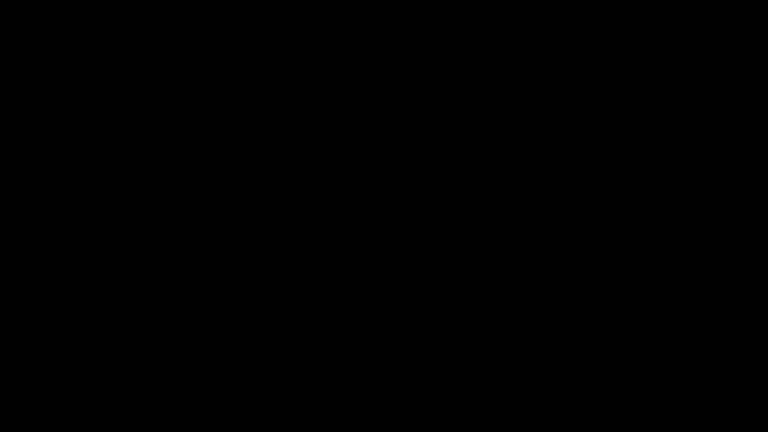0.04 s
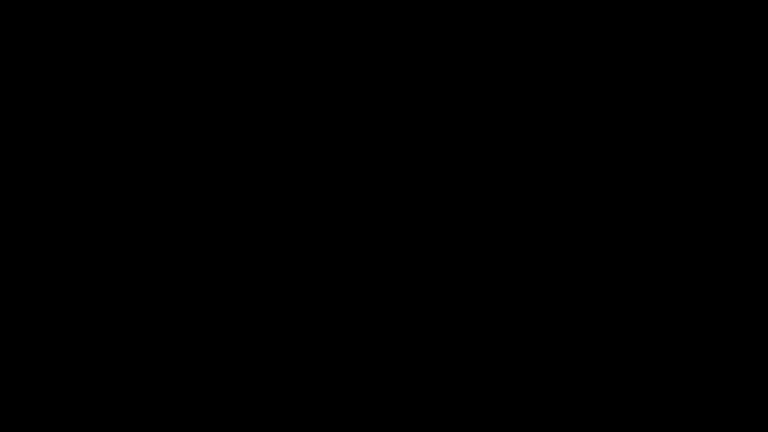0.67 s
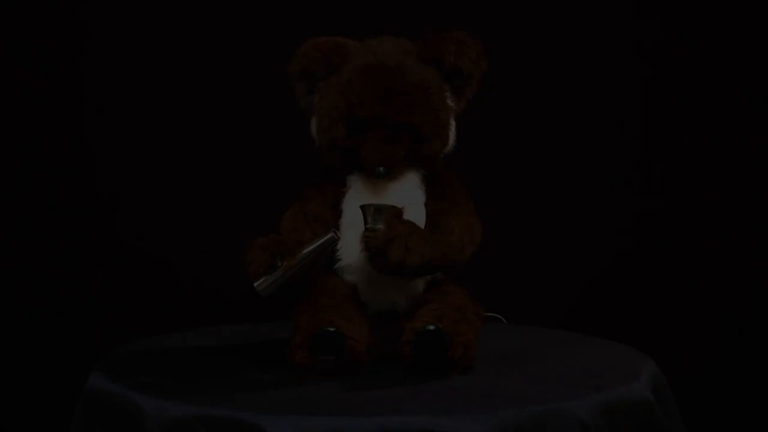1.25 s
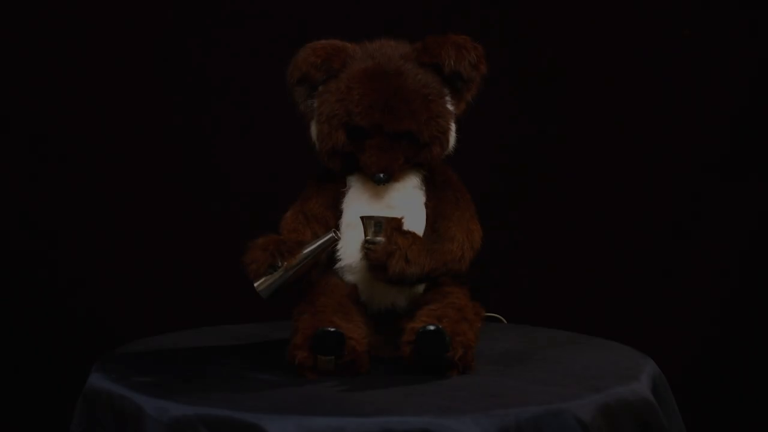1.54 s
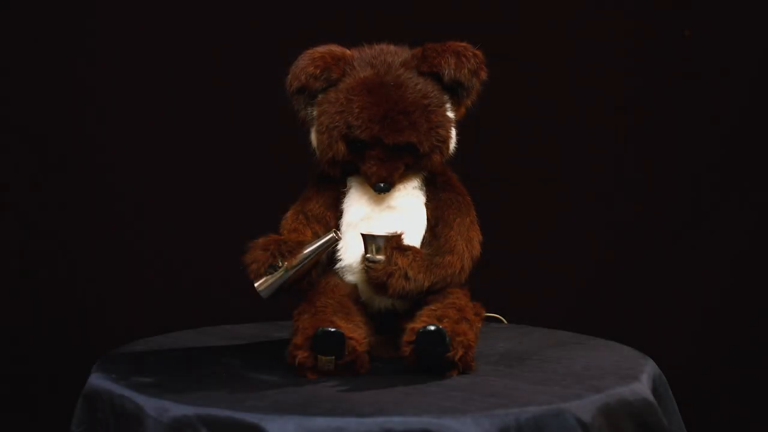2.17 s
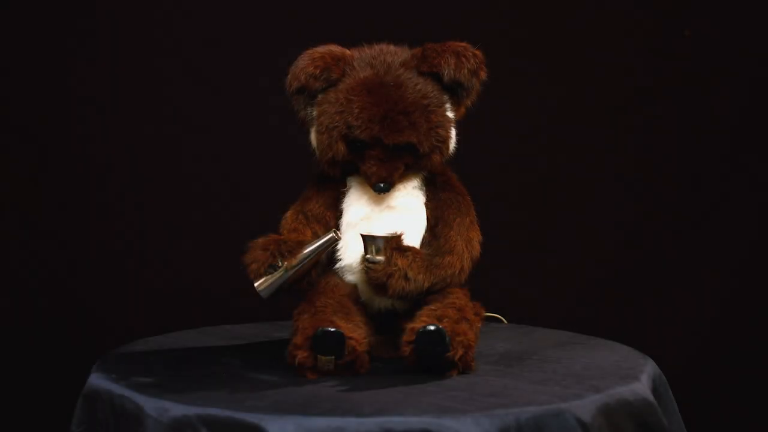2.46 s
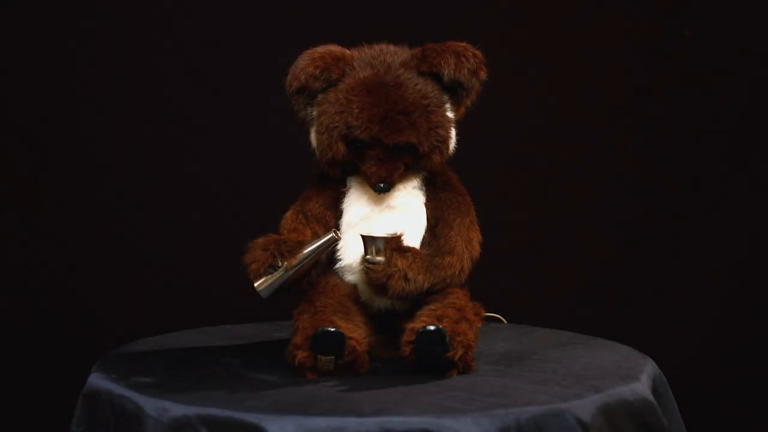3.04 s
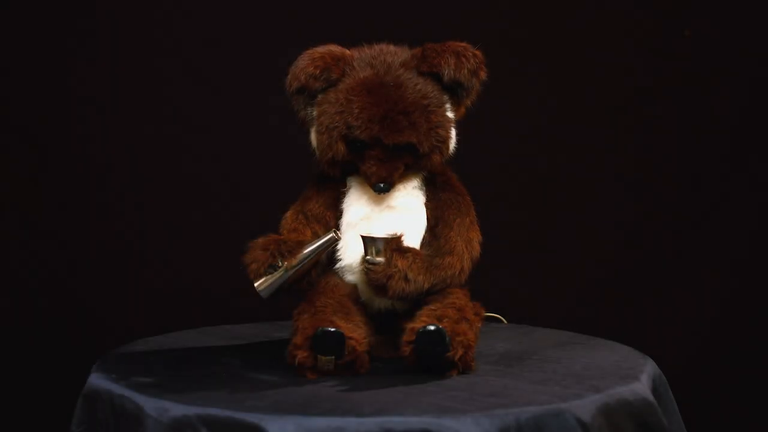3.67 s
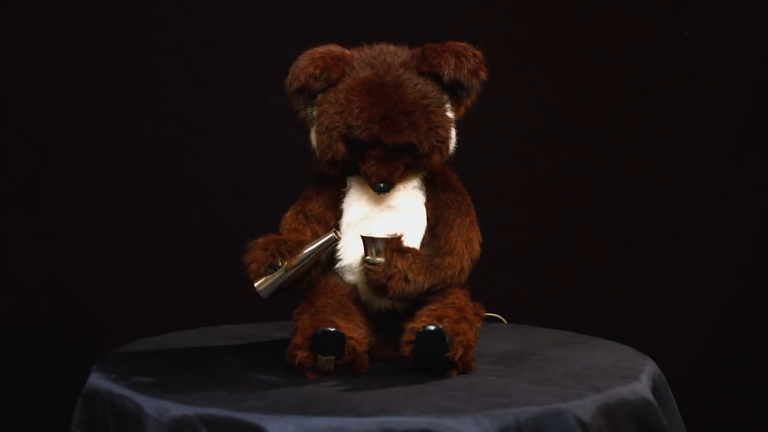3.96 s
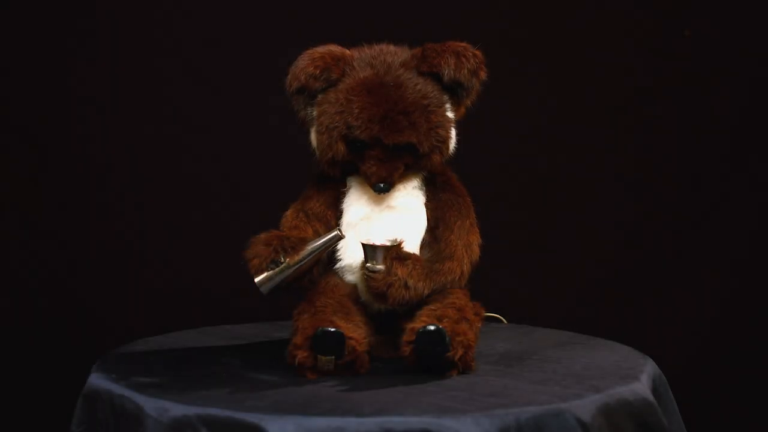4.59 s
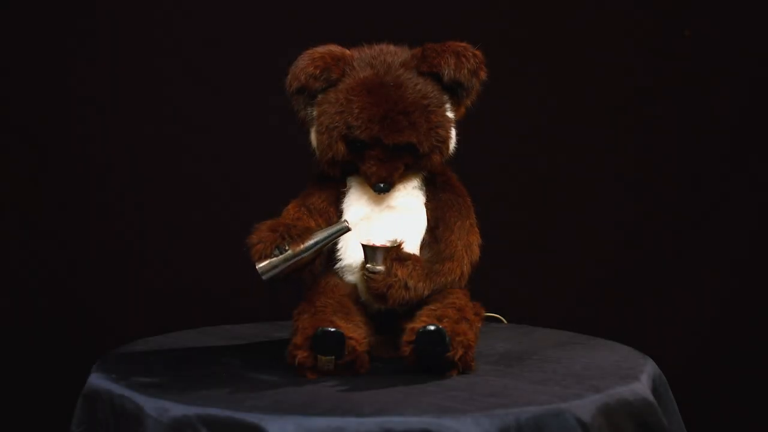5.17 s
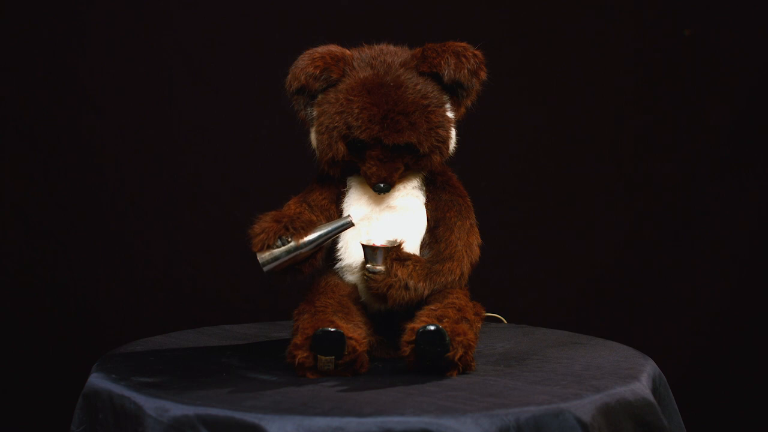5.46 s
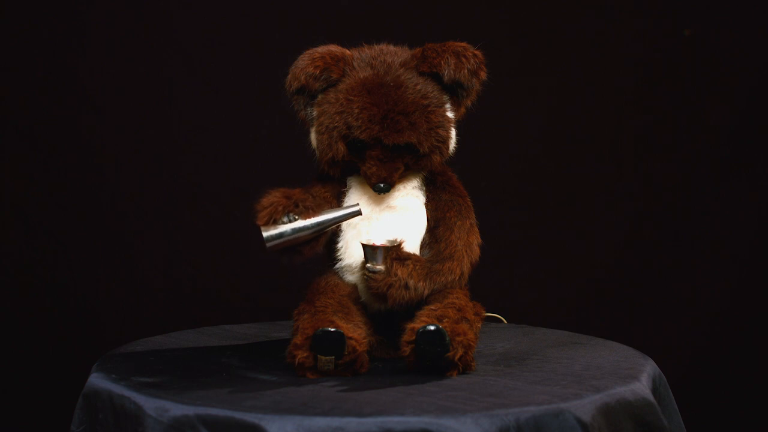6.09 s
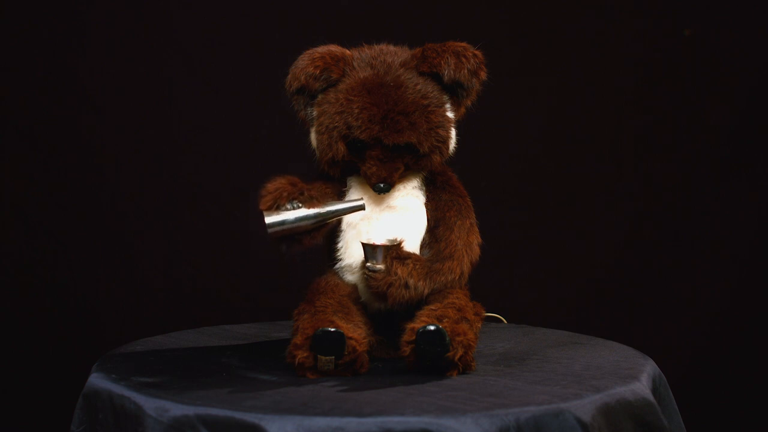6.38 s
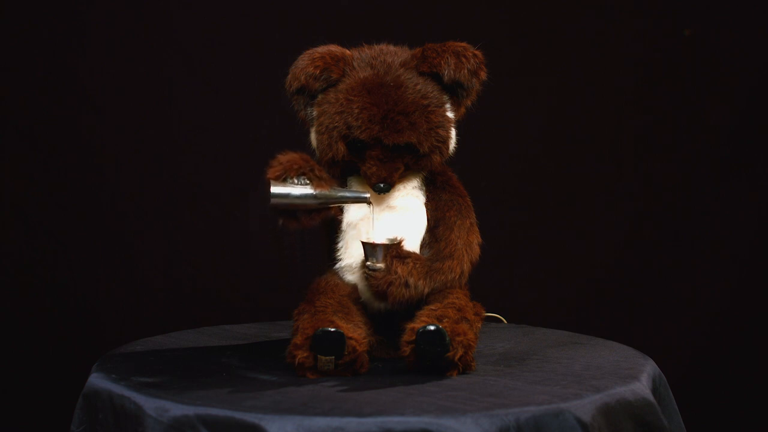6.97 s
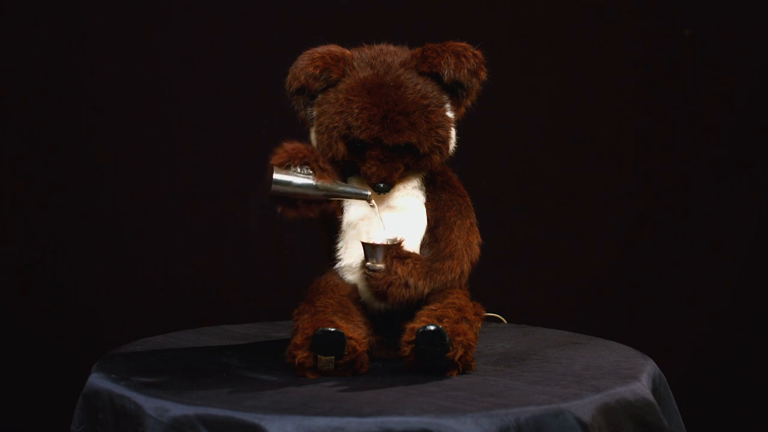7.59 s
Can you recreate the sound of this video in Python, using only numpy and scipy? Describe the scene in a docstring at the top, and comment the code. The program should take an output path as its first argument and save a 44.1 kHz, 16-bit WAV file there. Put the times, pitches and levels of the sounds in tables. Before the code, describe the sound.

Close, steady whine and rattle of a mechanical toy's gearbox, ticking a few times and slowing slightly with short gear scrapes.

```python
"""A motor-driven toy bear on a cloth-covered table slowly lifts a bottle and pours, in a quiet dry room.
After a short silence the toy fades in: its small motor and a gear wheel whine, and loose teeth rattle in
the metal gearbox under the fur. The linkage ticks three times. Near 5 s the arm starts to lift: a cam
(a lobed wheel) slows the motor, the gears grind briefly and the body rocks on the table. Near 6 s the
motor is back up to speed, and it runs on with a few more short grinds."""
import sys
import numpy as np
from scipy import signal
from scipy.fft import rfft, irfft
from scipy.io import wavfile

SR = 44100
rng = np.random.default_rng(int(sys.argv[2]) if len(sys.argv) > 2 else 0)


def store_pcm(level_fs):
    """Save levels as 16-bit WAV."""
    pcm = np.round(np.clip(level_fs, -1, 1) * 32767).astype(np.int16)
    wavfile.write(sys.argv[1], SR, np.atleast_2d(pcm).T)


N = 345303
TIME = np.arange(N) / SR


def from_db(db):
    """Turn decibels into a number to multiply by."""
    return 10 ** (np.asarray(db) / 20)


def unit_level(x):
    """Scale a sound so that its average level (rms) is 1."""
    return x / np.sqrt(np.mean(x ** 2) + 1e-20)


def ramp(start_s, end_s):
    """Rise evenly from 0 to 1."""
    return np.clip((TIME - start_s) / (end_s - start_s), 0, 1)


def swell(s, length):
    """A bell-shaped rise and fall around time s; length is its spread to either side."""
    return np.exp(-.5 * ((TIME - s) / length) ** 2)


def drift(hz):
    """A smooth random wander, about 1 in size; more hz makes it quicker."""
    step, warm_up = 40, 2000   # samples per point, points thrown away
    r = np.exp(-2 * np.pi * hz * step / SR)
    noise = rng.standard_normal(N // step + warm_up + 2)
    slow = signal.lfilter([1], [1, -2 * r, r * r], noise)[warm_up:]
    return np.interp(np.arange(N) / step, np.arange(len(slow)), unit_level(slow))


def colour(x, spectrum, size=8192):
    """Make each pitch louder or softer as a table says, fading out below its first row."""
    hz, db = np.transpose(spectrum)
    f = np.maximum(np.arange(size // 2 + 1) * SR / size, 1)
    gain = from_db(np.interp(np.log(f), np.log(hz), db)) * np.minimum(f / hz[0], 1) ** 2
    # minimum phase: the filter rings after a hit, never before it
    cepstrum = irfft(np.log(gain))
    cepstrum[1:size // 2] *= 2
    cepstrum[size // 2 + 1:] = 0
    return signal.fftconvolve(x, irfft(np.exp(rfft(cepstrum))))[:N]


def resonate(x, hz, width):
    """Let through a band of pitches around hz; width is in Hz too."""
    r = np.exp(-np.pi * width / SR)
    feedback = [1, -2 * r * np.cos(2 * np.pi * hz / SR), r * r]
    return signal.lfilter(np.array([1, 0, -1]) * (1 - r * r) / 2, feedback, x)


def ring(clicks, hz, ring_s):
    """Each click starts a pure tone that dies away by 60 dB in ring_s."""
    r = np.exp(-np.log(1000) / (ring_s * SR))
    angle = 2 * np.pi * hz / SR
    return signal.lfilter([0, np.sin(angle)], [1, -2 * r * np.cos(angle), r * r], clicks + 1e-18)


# The deep tone colour of the tabletop: (pitch [Hz], relative level [dB])
TABLETOP_COLOUR = [(25, -17), (45, -8), (62, -6.5), (85, -4), (100, 2.5), (140, -2), (200, 0.5),
                   (290, -6.5), (420, -3), (2000, -77)]
def tabletop():
    """The running toy shakes the table; as the arm starts to lift it rocks, then settles."""
    shake_db, rock_db = -60.5, -52.5
    rock_s, rise_s, settle_s = 4.88, .037, .42
    rocking = ramp(rock_s, rock_s + rise_s) * np.exp(-np.maximum(TIME - rock_s, 0) / settle_s)
    level = np.hypot(from_db(shake_db), from_db(rock_db) * rocking)
    return level * unit_level(colour(rng.standard_normal(N), TABLETOP_COLOUR))


# The body bumping on the table: (time [s], length [s], level [dB], pitch [Hz])
BODY_BUMPS = [(4.655, .02, -53, 204), (4.944, 0.025, -59, 130), (5.07, 0.022, -62, 101),
              (5.32, .07, -69, 70), (5.594, .03, -59, 212), (5.818, 0.063, -58, 205)]
def bumps():
    """Soft, low knocks through the cloth as the arm starts to lift."""
    out = np.zeros(N)
    for s, length, db, hz in BODY_BUMPS:
        rumble = resonate(resonate(rng.standard_normal(N), hz, width=70), hz, width=70)
        out += from_db(db) * swell(s, length) * unit_level(rumble)
    return out


# The bright tone colour of rubs and snaps: (pitch [Hz], relative level [dB])
RUB_COLOUR = [(2000, -10), (5000, 13), (8000, -1), (12000, -5), (16000, -16)]
# Light rubs: (time [s], length [s], level [dB])
RUBS = [(1.383, .013, -55), (1.764, 0.07, -54.5), (4.855, .015, -60), (5.76, .02, -66)]
def brushes():
    """Short, soft, high rubs, like fur brushing the arm."""
    rub = unit_level(colour(rng.standard_normal(N), RUB_COLOUR))
    return rub * sum(from_db(db) * swell(s, length) for s, length, db in RUBS)


# Slips of the linkage: (time [s], ping strength [dB], knock strength [dB], thump strength [dB])
LINK_SLIPS = [(1.486, -44.5, -42, -41.5), (3.055, -42.5, -42, -42), (4.036, -40, -16, -35)]
# The notes in a link's ping: (pitch [Hz], relative level [dB], ring time [s])
LINK_NOTES = [(5560, 3, .018), (7200, -3, .024), (7600, 2, 0.019), (8600, 2, .022), (8650, -5, .024),
              (12600, -12, .01)]
def ticks():
    """A link slips: it pings and snaps, knocks on the gearbox and thumps the body."""
    rebound_s, rebound_db, snap_s = .0095, -13, .0022
    s, *levels = np.transpose(LINK_SLIPS)
    clicks = np.zeros((3, N))
    clicks[:, (s * SR).astype(int)] = from_db(levels)
    ping, knock, thump = clicks
    ping = ping + from_db(rebound_db) * np.roll(ping, int(rebound_s * SR))   # the link lands once more
    out = sum(from_db(db - 9.5) * ring(ping, hz, ring_s) for hz, db, ring_s in LINK_NOTES)
    snap_fade = signal.lfilter([1], [1, -np.exp(-1 / (snap_s * SR))], ping + 1e-18)
    out += from_db(3) * colour(snap_fade * rng.standard_normal(N), RUB_COLOUR)
    out += .54 * ring(knock, 1860, .014) - .71 * ring(knock, 3700, .0043) + .17 * ring(knock, 4600, .008)
    return out + resonate(ring(thump, 330, .053), hz=260, width=160)


# The tone colour of the gearbox: (pitch [Hz], relative level [dB])
GEARBOX_COLOUR = [(380, -27.5), (665, -21.5), (740, -6.5), (860, -10), (1130, 0), (1340, -8), (1480, -14.5),
                  (1640, -7), (2030, -7.5), (2320, -18.5), (3100, -26.5), (4500, -24.5), (5700, -40),
                  (7000, -46), (9000, -55)]
def gearbox(x):
    """The metal box colours any sound made inside it, and the fur muffles it."""
    return colour(x, GEARBOX_COLOUR)


# A cam tips over or a tooth catches: (time [s], length [s], scrape level [dB], thud level [dB])
GEAR_CATCHES = [(4.82, .012, -36, -60), (4.853, 0.0079, -24, -58), (5.752, .015, -32, -60),
                (6.362, .006, -29.5, -80), (6.835, .008, -28.5, -80), (7.55, 0.0036, -37, -80)]
def grinds():
    """Slack between the teeth lets the gears scrape and rock the toy on the table."""
    scrape = gearbox(rng.standard_normal(N))
    box_ring = from_db(3) * resonate(scrape, hz=1900, width=790)
    scrape = unit_level(scrape + box_ring)
    thud = unit_level(resonate(rng.standard_normal(N), hz=45, width=60))
    return sum(swell(s, length) * (from_db(scrape_db) * scrape + from_db(thud_db) * thud)
               for s, length, scrape_db, thud_db in GEAR_CATCHES)


# Pitches at which the frame likes to ring: (pitch [Hz], width [Hz], boost [dB])
FRAME_NOTES = [(364, 12, 7), (471, 16, 15), (489, 8, 12), (515, 5, 6), (733, 12, 13.5), (768, 16, 11),
               (905, 24, 13), (936, 20, 14), (960, 8, 14), (1024, 12, 13.5), (1199, 8, 16), (1260, 8, 3),
               (1385, 10, 9)]
# Tones of the meshing gear teeth: (multiple of the tooth rate [x], relative level [dB])
GEAR_TONES = [(2, -57.5), (3, -48.5), (4, -44.5), (5, -43.5), (6, -50.5)]
# Tones of the motor shaft: (multiple of the turning rate [x], relative level [dB])
MOTOR_TONES = [(3, -64), (4, -56), (5, -61.5), (6, -45.5), (7, -50), (8, -41.5), (9, -46), (10, -43),
               (11, -56.5)]
def whine(rate, tones, flutter):
    """A turning part hums; each tone swells as it passes a frame note and flutters as teeth chatter."""
    phase = 2 * np.pi * np.cumsum(rate) / SR
    out = np.zeros(N)
    for multiple, db in tones:
        frame_power = 1 + sum(from_db(2 * boost) / (1 + (2 * (multiple * rate - hz) / width) ** 2)
                              for hz, width, boost in FRAME_NOTES)
        strength = 1 + flutter * (drift(30) + drift(5))
        tone = strength * np.sin(multiple * phase + rng.uniform(0, 2 * np.pi) + flutter * drift(27))
        out += from_db(db) * unit_level(np.sqrt(frame_power) * tone)
    return out


def impacts(rate, scatter_db, uneven_db, per_turn, slop_s=.00022):
    """One click per contact; each tooth has its own force and timing, and chance varies both."""
    at = np.flatnonzero(np.diff(np.floor(np.cumsum(rate) / SR)))
    tooth = np.arange(len(at)) % per_turn
    strength, place = rng.standard_normal((2, per_turn))
    late_s = slop_s * (rng.standard_normal(len(at)) + 2 * place[tooth])
    hit_db = uneven_db * strength[tooth] + scatter_db * rng.standard_normal(len(at))
    clicks = np.zeros(N)
    clicks[np.clip(at + (late_s * SR).astype(int), 0, N - 1)] = from_db(hit_db)
    return unit_level(clicks - clicks.mean())


# Sharp rings of the gearbox plates: (pitch [Hz], width [Hz], relative level [dB])
PLATE_NOTES = [(1836, 90, -16), (2230, 50, -9), (2430, 45, -6), (2490, 36, -5), (2560, 36, 0),
               (2636, 32, -2), (2760, 50, -7), (2905, 32, -3), (2980, 40, -1), (3335, 34, -1),
               (3402, 44, 5), (3625, 64, -1), (3969, 46, -4), (4390, 220, -2), (6950, 300, -9)]
def rattle(tooth_rate, motor_rate, plate_db):
    """Tooth knocks, motor knocks and sliding grit shake the gearbox and ring its plates."""
    teeth, bounce_s, lurch_db = 9, .0059, .59
    tooth_phase = 2 * np.pi * np.cumsum(tooth_rate) / SR
    knocks = from_db(-5.5) * impacts(tooth_rate, scatter_db=2, uneven_db=.9, per_turn=teeth)
    knocks += from_db(-11.5) * impacts(motor_rate, scatter_db=2.5, uneven_db=0, per_turn=1)
    # each knock bounces about the shell for a few milliseconds
    bounces = rfft(rng.standard_normal(N) * np.exp(-TIME / bounce_s))
    knocks = irfft(rfft(knocks) * bounces / np.abs(bounces), N)
    grit = from_db(-2.5) * rng.standard_normal(N) * (1 + .16 * np.cos(tooth_phase))
    # an oval wheel makes the sound throb twice per turn
    throb = 1 + .081 * (np.cos(2 * tooth_phase / teeth) + np.cos(4 * tooth_phase / teeth))
    # the loose gears rock to and fro about twenty times a second
    lurch = unit_level(resonate(resonate(rng.standard_normal(N), 15, 31), 15, 31))
    box = gearbox((knocks + grit) * throb * from_db(lurch_db * lurch))
    plates = sum(from_db(db) * resonate(box, hz, width) for hz, width, db in PLATE_NOTES)
    return unit_level(box + from_db(plate_db) * plates)


# Panels of the toy's shell: (pitch [Hz], width [Hz], boost [dB], change as the cam turns [dB/s],
# change while the cam presses [dB], change under full load [dB])
SHELL_PANELS = [(758, 59, -3, .8, -1.5, 1), (1190, 120, -1.05, 0, -0.5, 2),
                (1900, 880, -3.5, .5, 0.5, -1.4), (3100, 220, 6, -1, -0.5, 1.5),
                (4520, 1000, 1.5, -.5, -6, -2), (5850, 1300, 4, -0.44, -2.5, .5)]
def shell(sound, press, load):
    """The panels ring more or less freely as the cam turns, presses on them and loads the motor."""
    for hz, width, boost_db, turn_db_per_s, press_db, load_db in SHELL_PANELS:
        db = boost_db + turn_db_per_s * TIME + press_db * press + load_db * load
        sound = sound + (from_db(db) - 1) * resonate(sound, hz, width)
    return sound


# How fast the gears run, slowing under the cams: (time [s], speed [teeth/s])
GEAR_SPEED = [(0.8, 229), (1.35, 234.2), (1.6, 239.6), (1.8, 240.0), (2.05, 225.6), (2.25, 225.2),
              (2.48, 229.6), (2.66, 232.3), (2.92, 234), (3.25, 242.4), (3.55, 244.0), (4.1, 243.8),
              (4.78, 241.7), (4.9, 229.4), (5.15, 227.9), (5.58, 221.8), (5.8, 239.7), (7.8, 239.6)]
def scene():
    """The running toy, heard close up; load, cam pressure and arm height shape its whine and rattle."""
    free_rate, full_load_drop = 240, 15   # teeth per second
    motor_turns_per_tooth = .5256
    times, speeds = np.transpose(GEAR_SPEED)
    tooth_rate = np.interp(TIME, times, speeds) * (1 + .001 * drift(6))
    motor_rate = tooth_rate * motor_turns_per_tooth
    load = (free_rate - tooth_rate) / full_load_drop
    press = ramp(4.85, 4.927) - ramp(5.7, 5.777)   # the lifting cam presses on the shell, then lets go
    arm = ramp(5.55, 6)   # the arm swings clear of the body
    gear_db = 1.2 - .6 * load - 2 * press + .5 * arm
    motor_db = .8 - 2 * load - 2.5 * press - arm
    whines = from_db(gear_db) * whine(tooth_rate, GEAR_TONES, flutter=.26)
    whines += from_db(motor_db) * whine(motor_rate, MOTOR_TONES, flutter=.28)
    gears = rattle(tooth_rate, motor_rate, plate_db=1 - 3 * arm)   # the raised arm damps the plates
    force_db = -29.5 + .47 * arm + .27 * drift(6.9)   # the force on the teeth wanders
    gears = shell(gears, press, load) * from_db(force_db)
    return (whines + gears + tabletop() + ticks() + grinds() + bumps() + brushes())[None]


def record(dry):
    """Add microphone hiss and a slight offset from zero, fade in and cut off the very highest pitches."""
    hiss_db, offset, cutoff_hz = -63.5, -.00175, 15800
    hiss = from_db(hiss_db) * rng.standard_normal(N)
    faded = (dry + offset + hiss) * ramp(.78, 1.46)
    return signal.sosfilt(signal.ellip(12, .1, 90, cutoff_hz, fs=SR, output="sos"), faded)


dry = scene()
out = record(dry)
store_pcm(out)
```